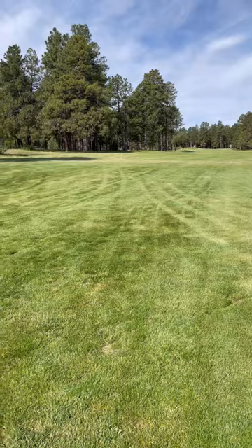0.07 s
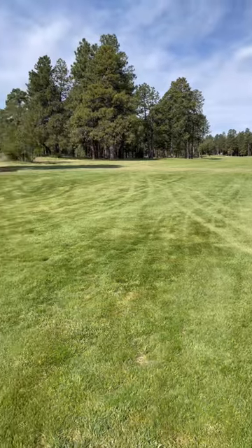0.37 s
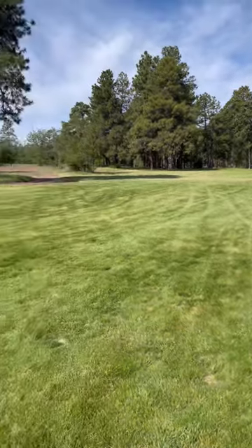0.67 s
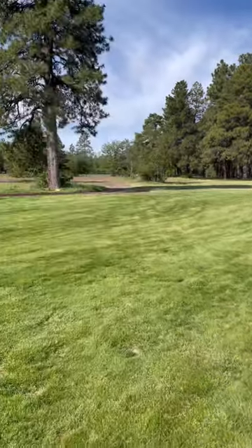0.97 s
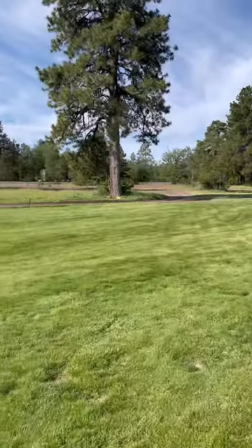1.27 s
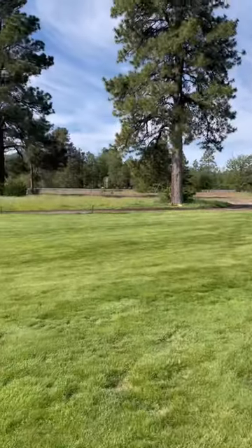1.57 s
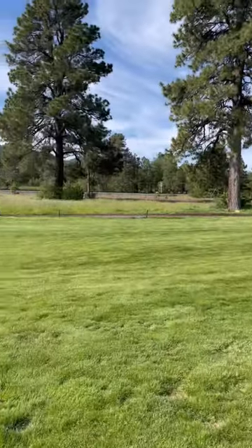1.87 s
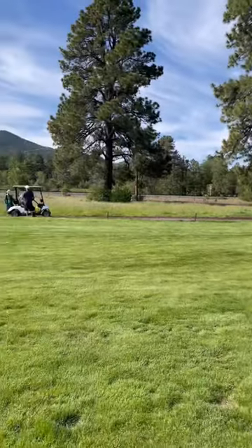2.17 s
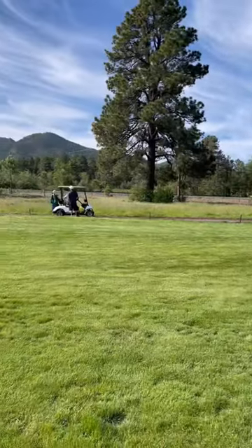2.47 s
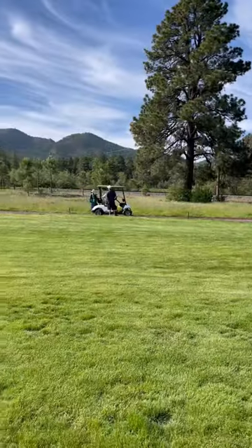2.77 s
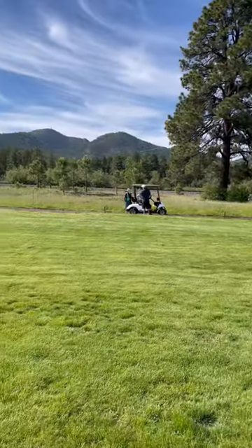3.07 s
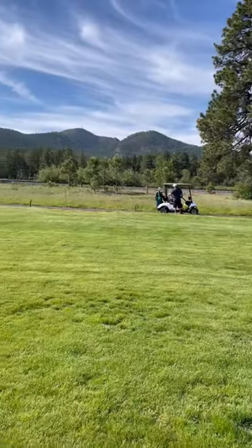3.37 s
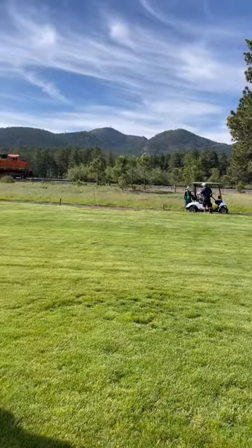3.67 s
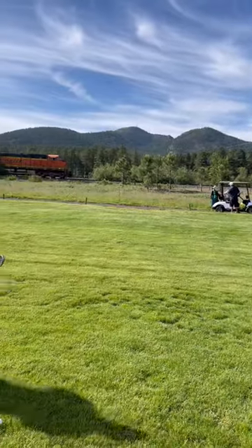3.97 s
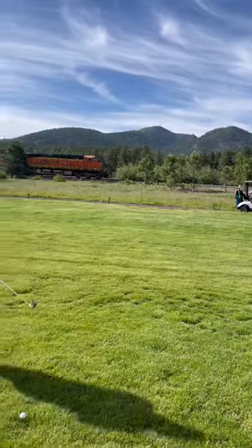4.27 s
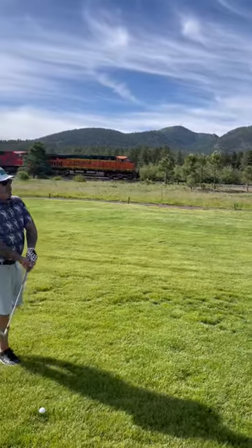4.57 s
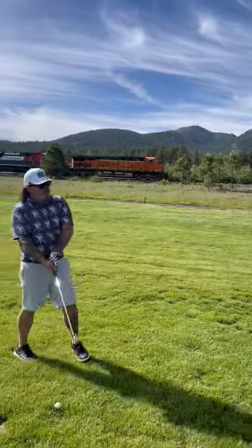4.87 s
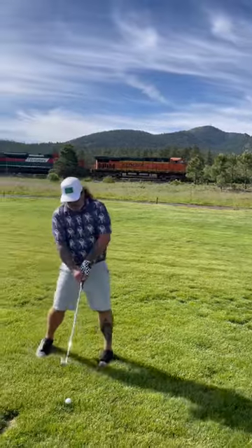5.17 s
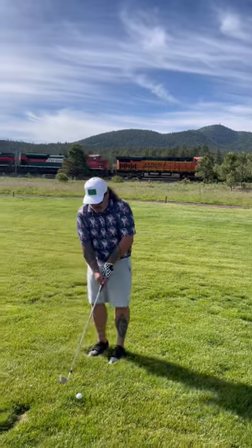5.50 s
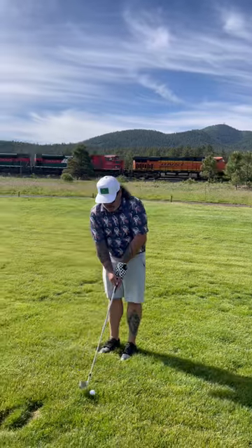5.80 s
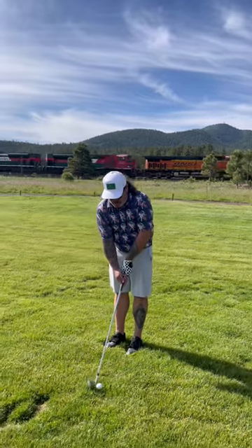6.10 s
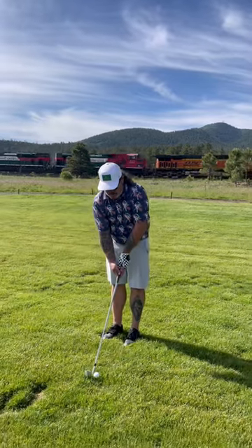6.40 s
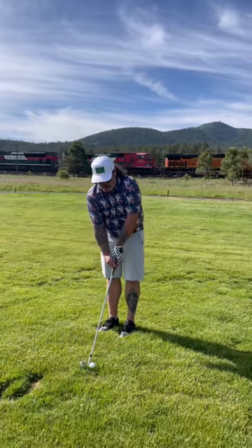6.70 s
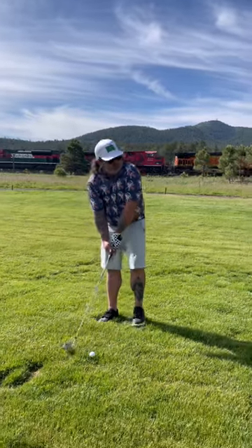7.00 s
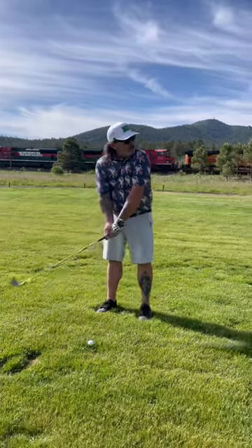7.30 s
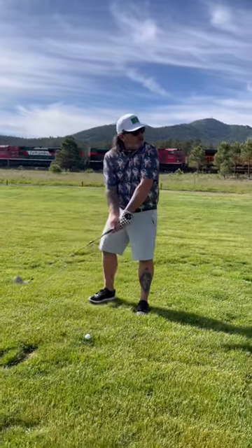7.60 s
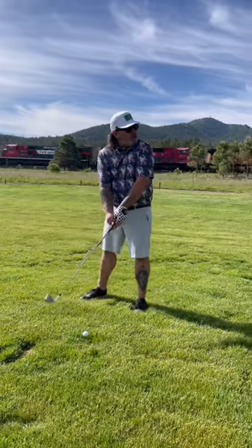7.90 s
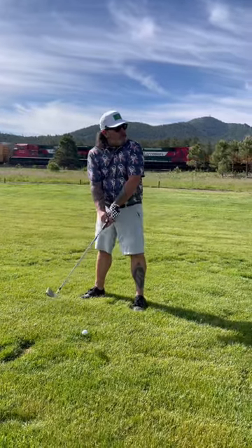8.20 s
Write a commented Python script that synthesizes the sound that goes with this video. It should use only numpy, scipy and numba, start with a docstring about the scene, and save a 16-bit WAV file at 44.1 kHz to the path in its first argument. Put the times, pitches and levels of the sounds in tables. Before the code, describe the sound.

A distant diesel freight train passes with a low engine drone, whining fans and roaring, hissing wheels that faintly ring on the rails.

```python
"""Distant diesel freight train

A string of locomotives hauls freight past, a few hundred metres off across open grass in a light breeze.
Exhaust notes beat against each other, fans and gears whine, and wheels roar, grind and ring on the rails.
We listen through a phone's two ports; as it turns to face the train, cloth brushes softly close by."""
import sys
import numpy as np
from scipy import signal
from scipy.fft import rfft, irfft, next_fast_len
from scipy.io import wavfile
from scipy.ndimage import map_coordinates
from numba import njit

SR = 44100
rng = np.random.default_rng(int(sys.argv[2]) if len(sys.argv) > 2 else 0)


def output_pcm(signal):
    """Save a mono or channel-first signal as 16-bit PCM at the path in sys.argv[1].

    Samples are clipped to [-1, 1] before scaling.
    """
    pcm = np.clip(np.atleast_2d(signal).T, -1, 1) * 32767
    wavfile.write(sys.argv[1], SR, np.round(pcm).astype(np.int16))


N = 363825
TIME = np.arange(N) / SR

# tone colours of the noise beds: frequency_hz, relative_db
GRIND_COLOUR = [(2950, -22), (3200, -1), (3550, -3), (3820, 0), (3960, -3), (4080, 2), (4350, -20)]
HISS_COLOUR = [(1500, -3.5), (2500, -6.5), (3200, 4.5), (4100, 5), (5000, -0.5), (6000, -7), (7000, -13.5),
               (8200, -14), (9200, -36.5)]
ROAR_COLOUR = [(400, -13), (700, -9), (850, -3.5), (1020, 1), (1300, -2.5), (1720, -7.5), (1950, -11),
               (2600, -11.5), (3400, -12.5), (6000, -57.5)]
FAN_COLOUR = [(250, -20), (420, -7.5), (560, -4), (680, 2.5), (800, -2), (1000, -8), (1500, -29.5)]
GAS_COLOUR = [(20, -12.5), (35, -9), (70, .5), (105, 1.5), (135, 2.5), (180, -1), (235, -4.5), (310, -10),
              (450, -12.5), (800, -30.5)]
RING_COLOUR = [(2500, -32), (2800, -4), (2950, 4), (3250, -14.5), (3600, -10.5)]
CLOTH_COLOUR = [(1200, -14), (2400, 2), (3050, 0), (3390, 10), (3600, 7.5), (3900, 11), (4550, 1.5),
                (5200, -8.5), (6300, -11.5), (8500, -29)]
# fader rides for the wheel grind, the wheel roar and the main gear whine: time_s, level_db
GRIND_LEVEL = [(0, -58), (.4, -54), (.75, -45), (1.35, -45), (2, -54), (3.2, -50), (4.5, -44), (5.8, -47.5),
               (6.6, -43.5), (8.25, -40.5)]
ROAR_LEVEL = [(0, -28), (1, -25.5), (2.3, -25.5), (3.5, -27), (5.5, -25.5), (6.25, -27), (6.7, -25),
              (7.15, -25.5), (8.25, -24.5)]
GEAR_LEVEL = [(0, -60), (.7, -47), (1.15, -38), (1.6, -45), (1.85, -34.5), (2.1, -34.5), (2.35, -49),
              (2.8, -34), (3.15, -40), (3.5, -35.5), (4.2, -44), (6.6, -50), (7.3, -39), (7.7, -40),
              (8.05, -34)]
# the lead engine comes out from behind the trees: time_s, gain_db
LEAD_LEVEL = [(0, -3.5), (1, -3.5), (2, -1), (3, 0.1), (4.8, 0.8), (6.2, 1.1), (8.25, -0.5)]
# soft strokes of cloth: peak_s, hold_s, level_db, fall_db_per_s
BRUSHES = [(.65, 0.23, -35.5, 17.5), (1.595, 0.14, -24.5, 898)]
# small cavities in the phone's case: pitch_hz, width_hz, relative_db
CASE_MODES = [(2960, 90, -6), (3390, 98, -1), (3730, 130, -1), (4560, 120, -10.5)]
# wheel flanges singing: peak_s, hold_s, pitch_hz, level_db
SQUEALS = [(5.17, .1, 2875, -43), (5.2, .08, 2680, -46), (7.05, 1.1, 2846, -44)]
# wheels set the rail ringing: peak_s, level_db
RAIL_RINGS = [(5.5, -49), (5.8, -31), (7.1, -32.5)]
# fans, gears and blowers on the lead engine:
# cycle_multiple, level_db, scattered_share, loudest_s, half_width_s
WHINES = [(40.3, -37.5, .7, 3, 2.6), (40.4, -35.7, .8, 7.3, 1.2), (79.9, -30.2, .24, 4.4, 2),
          (95.5, -35, .2, 2.4, .7), (95.5, -39, .3, 4, .3), (95.5, -45, .3, .4, .8),
          (95.5, -39, .4, 6.2, 1.2), (120, -38, .4, 2.1, 1), (120, -33.6, .6, 5.55, .85),
          (126.2, -42, .4, 3.8, 2), (143.1, -36, .4, 7.2, 1.2), (200.1, -38.7, .45, 6.8, 2.8),
          (238.6, -47, .6, 3.8, 3), (358, -51, .7, 2.4, 1.2)]
# exhaust harmonics of the lead and trailing engines: cycle_multiple, relative_db
FOUR_STROKE_NOTES = [(5, -42), (6, -22.4), (7, -43), (8, -34), (9, -17), (10, -31), (11, -28.5),
                     (12, -19.3), (13, -33.5), (14, -38), (15, -20.8), (16, -38), (17, -39), (18, -33.5),
                     (19, -41), (21, -36), (22, -42), (24, -44), (26, -40), (27, -52), (28, -49), (30, -49)]
TWO_STROKE_NOTES = [(3, -40), (4, -38), (5, -30.5), (6, -31), (7, -37), (8, -26.5), (9, -32), (10, -33),
                    (11, -47), (12, -48), (13, -47), (14, -50), (15, -48)]
# three narrow treble hollows that slide as the phone turns: time_s, centre_hz, width_hz, depth_share
LOW_HOLLOW = [(0, 2520, 600, .75), (1.25, 2320, 450, .72), (1.6, 2300, 500, 0)]
HIGH_HOLLOW = [(1.75, 3900, 500, 0), (2.3, 3650, 500, .35), (3.7, 3310, 380, .52), (5.25, 3220, 330, .68),
               (5.6, 2950, 400, .35), (6.8, 2900, 400, .35), (8.25, 2900, 400, .35)]
TOP_HOLLOW = [(0, 4750, 450, .4), (.7, 4950, 300, .15), (1.7, 4950, 300, .35), (2.4, 5000, 300, 0)]
# bounce off whoever holds the phone, left then right: delay_ahead_ms, delay_ms_per_deg, level_db
BODY_ECHOES = [(2.6, -.005, -22), (2.95, -.009, -19)]

FOUR_STROKE_HZ, TWO_STROKE_HZ = 8.902, 16.164  # engine cycle rates at the start
FOUR_SAG_HZ_PER_S, TWO_SAG_HZ_PER_S = .0192, .0312
IN_STEP_S = 5.088  # the engines fire together here, and the drone swells
BENDS_BELOW_HZ, SHADED_ABOVE_HZ = 42, 64  # the deepest notes bend round the trees
TURN_DEG, TURN_S, AHEAD_S, DRIFT_DEG_PER_S = 94.4, 2.83, 4.06, 16
BEHIND_DEG, SHIELD_DB_PER_DEG = 58.3, .05  # beyond this bearing the phone is shielded from the roar
MID_PAN_DB, PORT_LAG_MS_PER_DEG = 8.5, .0014
OPEN_S, TOP_HZ = .036, 8800


def undb(db):
    """Decibels to gain."""
    return 10 ** (np.asarray(db) / 20)


def curve(rows):
    """Automation lanes: each column after time_s, joined by straight lines."""
    times, *columns = np.transpose(rows)
    return [np.interp(TIME, times, column) for column in columns]


def walk(rate):
    """Smooth random wobble with a spread near 1, changing about rate times a second."""
    knots = rng.standard_normal(400)
    coarse = map_coordinates(knots, [5 + TIME[::100] * rate], order=3, mode="wrap")
    return np.interp(TIME, TIME[::100], coarse)


def swell(peak_s, hold_s, rise_db_per_s, fall_db_per_s):
    """Attack, hold and release, in dB relative to the peak."""
    before_s, after_s = np.maximum(peak_s - TIME, 0), np.maximum(TIME - peak_s - hold_s, 0)
    return -rise_db_per_s * before_s - fall_db_per_s * after_s


def going_by(nearest_s, half_width_s, db):
    """Pass-by level in dB: it falls with distance either side of the nearest point."""
    return db - 10 * np.log10(1 + ((TIME - nearest_s) / half_width_s) ** 2)


def pan(db):
    """Equal-power gains for a left-minus-right level difference."""
    return np.sqrt(2 / (1 + undb(np.array([-db, db])) ** 2))


def band(x, lo_hz, hi_hz):
    """The part of a sound between two frequencies, in phase with the rest."""
    return signal.sosfiltfilt(signal.butter(2, [lo_hz, hi_hz], "band", fs=SR, output="sos"), x)


@njit
def bandpass(x, hz, width_hz):
    """State-variable band-pass; centre and width may hold still or sweep."""
    hz, width_hz = hz * np.ones(len(x)), width_hz * np.ones(len(x))
    y, mid, low = np.empty(len(x)), 0., 0.
    for i in range(len(x)):
        g, damping = np.tan(np.pi * hz[i] / SR), width_hz[i] / hz[i]
        ring = (mid + g * (x[i] - low)) / (1 + g * (g + damping))
        mid, low = 2 * ring - mid, low + 2 * g * ring
        y[i] = damping * ring
    return y


def noise(colour):
    """Noise of rms 1 in a given colour, rolled off past both ends."""
    hz, db = np.transpose(colour)
    size = next_fast_len(N)
    bins_hz = np.arange(size // 2 + 1) * SR / size + 1e-3
    gain = undb(np.interp(np.log(bins_hz), np.log(hz), db))
    skirts = np.minimum(1, hz[-1] / bins_hz) ** 2 * np.minimum(1, bins_hz / hz[0])
    x = irfft(rfft(rng.standard_normal(size)) * gain * skirts, size)[:N]
    return x / x.std()


def rush(colour, db, woods_db):
    """Noise by three paths: straight from the track, and scattered by the woods to each port."""
    return undb(db) * np.array([undb(path_db) * noise(colour) for path_db in (0, woods_db, woods_db)])


def partial(phase, scatter, rate):
    """A tone through moving air: a direct part, and a scattered share that fades in and out."""
    share = np.clip(scatter, 0, 1)
    direct, stray = np.sqrt(2 * (1 - share)), np.sqrt(share)
    return (direct + stray * walk(rate)) * np.cos(phase) + stray * walk(rate) * np.sin(phase)


def bearing():
    """Degrees the train lies to the left: the phone swings round to it, then it drifts to the right."""
    still_to_turn = np.clip(1 - TIME / TURN_S, 0, 1) ** 1.24
    drift = np.arctan(np.radians(DRIFT_DEG_PER_S) * (AHEAD_S - TIME))
    return TURN_DEG * still_to_turn + np.degrees(drift)


def wrap(x, degrees, ahead_hz, hz_per_deg, width_hz, null_deg, span_deg):
    """One band wraps round the case in antiphase: it cancels at null_deg and flips beyond it."""
    depth = np.clip(1 + (degrees - null_deg) / span_deg, 0, 1.75)
    return x - depth * bandpass(x, ahead_hz + hz_per_deg * degrees, width_hz)


def ports(x, degrees):
    """Two ports in one case: each is shaded in turn, and the far one hears the midrange late."""
    leftward = np.sin(np.radians(degrees))
    left_db, shade = MID_PAN_DB * leftward, leftward ** 2
    x = x - shade * bandpass(x, hz=5050, width_hz=800)
    x = x - .39 * shade * bandpass(x, hz=7300, width_hz=2200)
    # the mids favour the port facing the train; the presence band is scooped from both
    mid_tilt = (pan(left_db) - 1) * band(x, 400, 2100)
    scoop = (pan(-.25 * left_db) - 1.94) * band(x, 3110, 4360)
    left, right = x + mid_tilt + scoop
    mids = band(right, 420, 2300)
    lag_samples = PORT_LAG_MS_PER_DEG * degrees * SR / 1000
    right = right - mids + map_coordinates(mids, [np.arange(N) - lag_samples], order=3, mode="nearest")
    # the top treble reaches the right port flipped
    right = right - 2 * bandpass(right, hz=8500, width_hz=4600)
    left = wrap(left, degrees, ahead_hz=3328, hz_per_deg=11, width_hz=498, null_deg=71, span_deg=-67.5)
    right = wrap(right, degrees, ahead_hz=2460, hz_per_deg=1.8, width_hz=940, null_deg=50, span_deg=44)
    return np.array([left, right])


def body_echo(x, degrees):
    """A short bounce off the holder combs the sound; the ripples slide with the bearing."""
    x = band(x, 960, 7000)
    return np.array([undb(db) * np.interp(TIME - (ms + ms_per_deg * degrees) / 1000, TIME, x)
                     for ms, ms_per_deg, db in BODY_ECHOES])


def hollow(pair, rows):
    """A sweeping notch in the centre of the stereo image."""
    hz, width_hz, depth = curve(rows)
    return pair - np.clip(depth, 0, 1) * bandpass(pair.mean(axis=0), hz, width_hz)


def cloth_brush():
    """Cloth slides near the turning phone: faintly, then more firmly, and stops."""
    strokes_db = [db + swell(s, hold_s, 57.5, fall) for s, hold_s, db, fall in BRUSHES]
    return noise(CLOTH_COLOUR) * undb(np.max(strokes_db, axis=0) + .6 * walk(40))


def cloth_rasp():
    """The firmest stroke rings the case's small cavities, mostly on the right, and breaks off."""
    pair = np.array([sum(undb(db) * bandpass(rng.standard_normal(N), hz, width_hz)
                         for hz, width_hz, db in CASE_MODES) for _ in range(2)])
    stroke_db = -32.5 + swell(peak_s=1.66, hold_s=.065, rise_db_per_s=48, fall_db_per_s=700)
    return pan(-7)[:, None] * pair / pair.std() * undb(stroke_db + 1.2 * walk(45))


def flange_squeals():
    """Now and then a wheel flange rubs the rail and sings a thin, hoarse note."""
    out = 0
    for peak_s, hold_s, hz, db in SQUEALS:
        phase = 2 * np.pi * np.cumsum(hz + 11 * walk(22)) / SR
        out += undb(db + swell(peak_s, hold_s, 120, 90)) * partial(phase, scatter=.6, rate=45)
    return out


def wheel_grind():
    """Dry wheels grind out swells of coarse, metallic hiss."""
    return noise(GRIND_COLOUR) * undb(curve(GRIND_LEVEL)[0] + 1.2 * walk(9) + 1.2 * walk(35))


def rail_ring():
    """Wheels start a narrow ring in the rail, with a long tail."""
    rings_db = [db + swell(s, hold_s=0, rise_db_per_s=53.5, fall_db_per_s=4) for s, db in RAIL_RINGS]
    return rush(RING_COLOUR, np.max(rings_db, axis=0), woods_db=-21)


def rail_hiss(shield_db):
    """Hundreds of wheels merge into one smooth hiss."""
    pass_db = going_by(nearest_s=7.93, half_width_s=5.4, db=-32)
    return rush(HISS_COLOUR, pass_db + 1.33 * shield_db + .9 * walk(35), woods_db=-3.5)


def wheel_roar(shield_db):
    """The long line of wheels roars on the rails in mild surges."""
    return rush(ROAR_COLOUR, curve(ROAR_LEVEL)[0] + shield_db + .83 * walk(30), woods_db=-8)


def fan_rush(shield_db):
    """The fans push a midrange rush of air as they pass."""
    pass_db = going_by(nearest_s=4.1, half_width_s=2.46, db=-28.5)
    return rush(FAN_COLOUR, pass_db + .71 * shield_db + .72 * walk(25), woods_db=-13.5)


def turbo(cycle_hz):
    """The turbocharger's blades whistle thinly; the note wanders and the air scatters it."""
    phase = 2 * np.pi * np.cumsum(462.3 * cycle_hz + 2 * walk(4)) / SR
    pass_db = going_by(nearest_s=8.6, half_width_s=4.3, db=-51)
    return undb(pass_db) * partial(phase, scatter=.5, rate=45)


def whines(cycle_hz):
    """Fan and gear tones swell as each one faces the phone, fluttering in the breeze."""
    crank = 2 * np.pi * np.cumsum(cycle_hz) / SR
    out = undb(curve(GEAR_LEVEL)[0]) * partial(190.85 * crank, scatter=.06, rate=16)
    for multiple, db, scatter, loudest_s, half_width_s in WHINES:
        beam = 1 / np.hypot(1, ((TIME - loudest_s) / half_width_s) ** 2)
        out += beam * undb(db + .8 * walk(2.5)) * partial(multiple * crank, scatter, rate=22)
    return out


def gas_rumble():
    """Exhaust gas lays a low rumble under the engine notes."""
    pass_db = going_by(nearest_s=8.8, half_width_s=5.55, db=-23.5)
    return noise(GAS_COLOUR) * undb(pass_db + .31 * walk(12))


def engine(cycle_hz, notes, gain_db, firing_multiple, scatter, fade_rate, stack_hz=110, stack_q=3):
    """Regular firings ring the exhaust stack; unequal cylinders add loose harmonics in between."""
    cycles = np.cumsum(cycle_hz) / SR
    crank = 2 * np.pi * (cycles - np.interp(IN_STEP_S, TIME, cycles))
    out = 0
    for multiple, db in notes:
        hz = multiple * cycle_hz.mean()
        ratio = hz / stack_hz
        stack_lag = 2 * np.arctan(stack_q * (ratio - 1 / ratio))
        loose_lag = 2 * np.pi * rng.random() * (multiple % firing_multiple > 0)
        shaded = np.interp(hz, [BENDS_BELOW_HZ, SHADED_ABOVE_HZ], [0, 1])
        # the air scatters the upper harmonics most
        tone = partial(multiple * crank - stack_lag - loose_lag, scatter * ratio ** 2, fade_rate)
        out -= undb(db + shaded * gain_db) * tone
    return out


def exhausts(four_hz, two_hz):
    """A steady four-stroke chugs in the lead; the two-strokes behind it beat slowly against it."""
    lead_db = curve(LEAD_LEVEL)[0]
    trailing_db = going_by(nearest_s=7.7, half_width_s=5.4, db=3.06)
    lead = engine(four_hz, FOUR_STROKE_NOTES, lead_db, firing_multiple=3, scatter=.008, fade_rate=2)
    trailing = engine(two_hz, TWO_STROKE_NOTES, trailing_db, firing_multiple=1, scatter=.06, fade_rate=1.6)
    return lead + trailing


def scene():
    """The mix: engines, fans and wheels reach the two ports over a wide wash from the woods."""
    four_hz = FOUR_STROKE_HZ - FOUR_SAG_HZ_PER_S * TIME
    two_hz = TWO_STROKE_HZ - TWO_SAG_HZ_PER_S * TIME
    degrees = bearing()
    shield_db = -SHIELD_DB_PER_DEG * np.maximum(degrees - BEHIND_DEG, 0)
    gas = gas_rumble()
    direct, *woods = fan_rush(shield_db) + wheel_roar(shield_db) + rail_hiss(shield_db) + rail_ring()
    engines = exhausts(four_hz, two_hz) + gas + undb(.5 * shield_db) * whines(four_hz)
    pair = ports(engines + direct + cloth_brush(), degrees) + body_echo(direct, degrees)
    pair += band(np.array(woods), 200, 9200) + wheel_grind()
    for rows in (LOW_HOLLOW, HIGH_HOLLOW, TOP_HOLLOW):
        pair = hollow(pair, rows)
    return pair + flange_squeals() + turbo(four_hz) + cloth_rasp()


def record(dry):
    """The input opens after a moment, rounds the tallest peaks and cuts the top."""
    opened = np.clip((TIME - OPEN_S) * 500, 0, 1)
    rounded = dry / (1 + (dry / .95) ** 10) ** .1
    return signal.sosfilt(signal.ellip(8, .2, 80, TOP_HZ, fs=SR, output="sos"), rounded * opened)


dry = scene()
out = record(dry)
output_pcm(out)
```